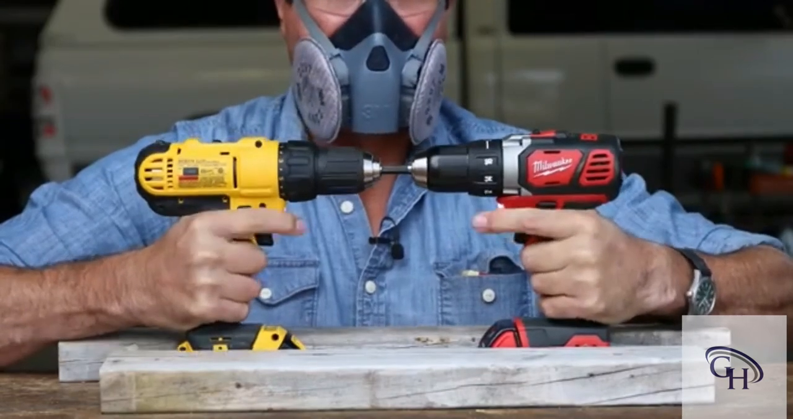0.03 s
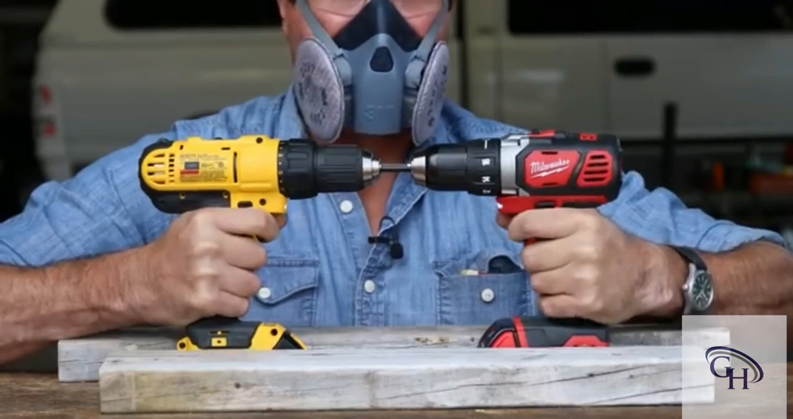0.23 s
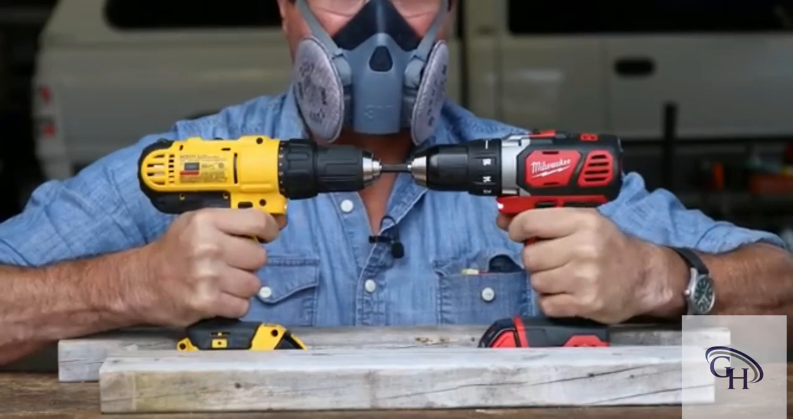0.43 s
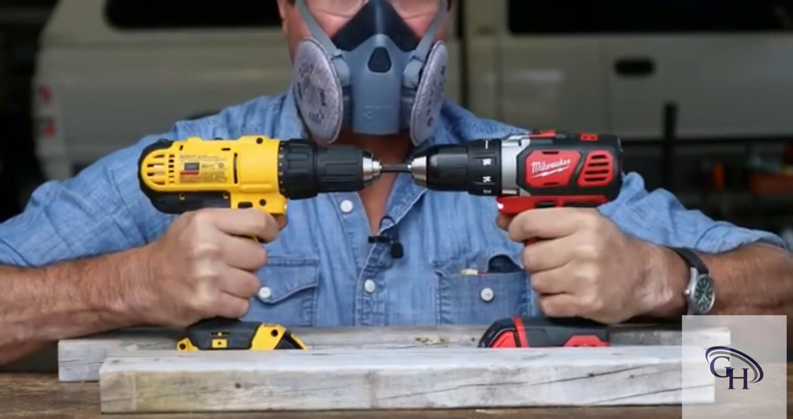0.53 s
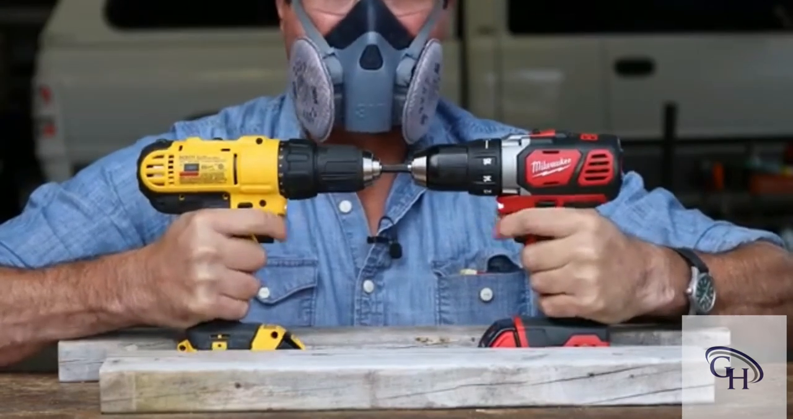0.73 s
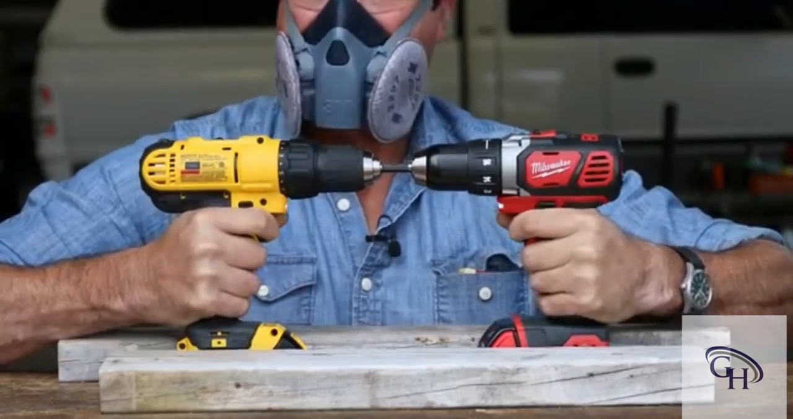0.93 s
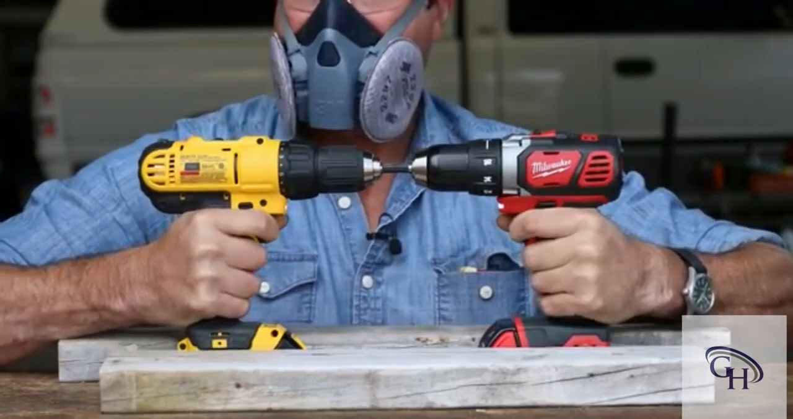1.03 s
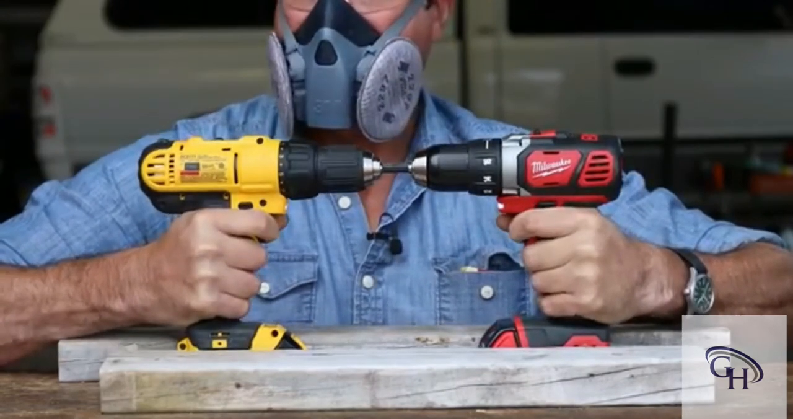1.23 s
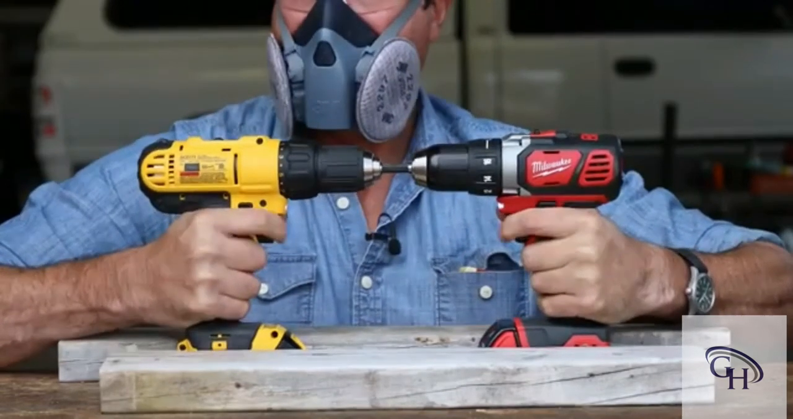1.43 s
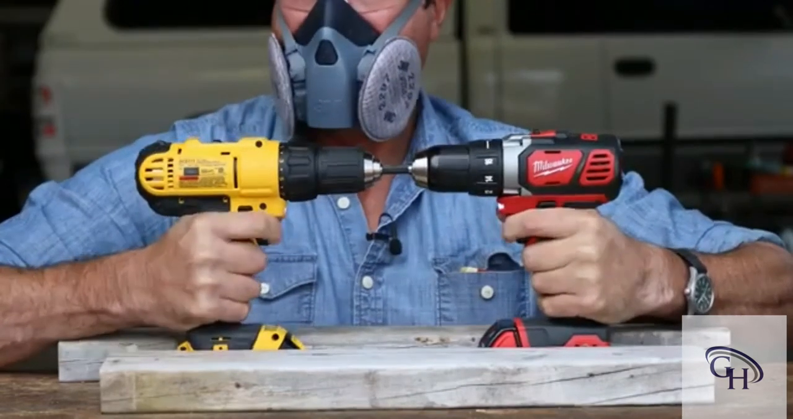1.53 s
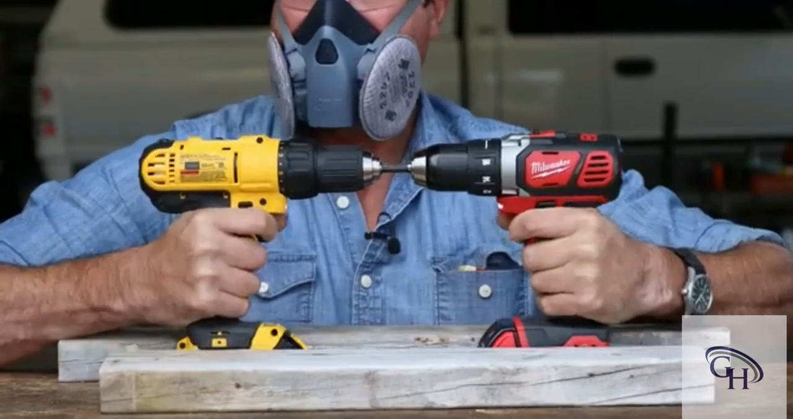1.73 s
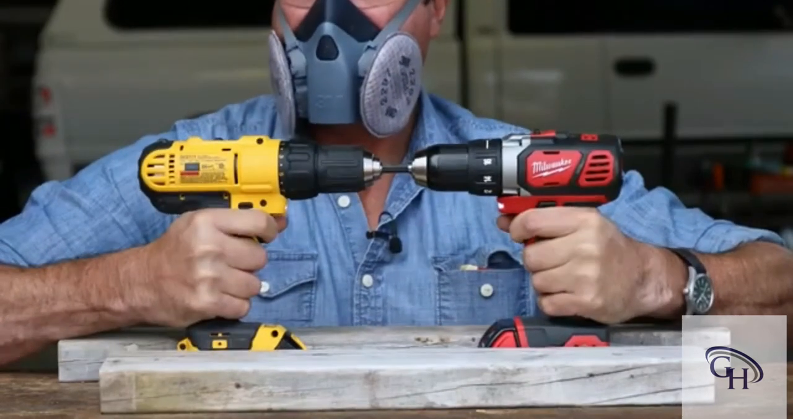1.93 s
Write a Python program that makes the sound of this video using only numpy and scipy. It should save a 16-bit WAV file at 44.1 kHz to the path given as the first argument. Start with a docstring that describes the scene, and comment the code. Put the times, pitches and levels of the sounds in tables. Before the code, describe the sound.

Two joined cordless drills jolt against each other, with loud hollow knocks at about 0.2, 0.95 and 1.7 seconds. Faint trigger clicks and a brief gear rasp lead into each knock, and gear chatter and soft low thumps follow. A sharp steel clack comes at 0.4 seconds and small clinks near 1.7. After each jolt, the workshop's reverberation rumbles away into quiet.

```python
"""Two cordless drills, joined chuck to chuck by one bit, are triggered against each other three times.
In each pull the triggers click and a stalled motor squeaks. The gears rasp through their slack, then
lock, and the impact excites the housings' modes in a hollow knock. The gears chatter and fall back as
the recoil thumps in the arms; the first release is a sharp clack of ringing steel.
After every jolt the workshop's reverberation rumbles away into quiet background noise."""
import sys
import numpy as np
from scipy import signal
from scipy.fft import rfft, irfft, next_fast_len
from scipy.io import wavfile

SR = 44100
rng = np.random.default_rng(int(sys.argv[2]) if len(sys.argv) > 2 else 0)


def file_out(sig):
    """Save sig as 16-bit WAV at sys.argv[1]."""
    # one column per channel
    cols = np.atleast_2d(sig).T
    # limit, then scale
    lim = np.clip(cols, -1, 1)
    pcm = np.round(lim * 32767).astype(np.int16)
    wavfile.write(sys.argv[1], SR, pcm)


N = 88200
T = np.arange(SR // 3) / SR  # time within one event [s]
HZ = np.fft.rfftfreq(2 * len(T), 1 / SR)


def amp(db):
    """Amplitude ratio of a level in decibels."""
    return 10 ** (np.asarray(db) / 20)


def unit_rms(x):
    """Normalisation to an rms of 1."""
    return x / np.sqrt(np.mean(x ** 2) + 1e-20)


def curve_at(points, hz):
    """Interpolation of (frequency, value) points on a logarithmic frequency axis."""
    freqs, values = np.transpose(points)
    return np.interp(np.log(hz + 1), np.log(freqs + 1), values)


def filtered(x, spectrum, tilt=0):
    """Zero-phase filtering by a spectrum, tilted above 1 kHz in dB per octave."""
    size = next_fast_len(len(x) + SR // 10)
    hz = np.fft.rfftfreq(size, 1 / SR)
    octaves = np.log2(np.maximum(hz / 1000, 1))
    gain = amp(curve_at(spectrum, hz) + tilt * octaves)
    return irfft(rfft(x, size) * gain, size)[:len(x)]


def noise(spectrum, tilt=0, size=len(T)):
    """Spectrally shaped Gaussian noise of rms 1."""
    return unit_rms(filtered(rng.standard_normal(size), spectrum, tilt))


def decay(t60, t=T):
    """Exponential decay, 60 dB in t60 seconds."""
    return np.exp(-np.log(1000) * t / t60)


def rise(attack_s, t=T):
    """First-order step response: a soft onset."""
    return 1 - np.exp(-t / attack_s)


def ring(modes, pitch=1):
    """Free vibration as a sum of damped sinusoids."""
    return sum(amp(db) * decay(t60) * np.sin(2 * np.pi * hz * pitch * T) for hz, db, t60 in modes)


def impulse_response(gain_db):
    """Minimum-phase response of a body with this gain at each of HZ, scaled to peak 1."""
    cepstrum = irfft(np.log(amp(gain_db)))[:len(T)]
    causal = cepstrum * np.where(T > 0, 2, 1)
    response = irfft(np.exp(rfft(causal, 2 * len(T))))[:len(T)]
    return response / np.abs(response).max()


def add(track, start_s, x):
    """Superposition of x on the track from start_s."""
    i = int(np.clip(round(start_s * SR), 0, N - 1))
    track[i:i + len(x)] += x[:N - i]


# Impacts on the housings: (time [s], level [dB], pitch factor [ratio])
KNOCKS = [(0.0595, -33.5, 1), (.095, -42.5, 0.69), (.1958, -36, 0.91), (0.2233, .5, 1.06),
          (.293, -30, 1.04), (.3858, -20, 1.08), (0.8115, -33, 0.97), (.833, -41.5, 0.81),
          (.953, -1, 1.023), (1.025, -42, 0.92), (1.1134, -30, 1.05), (1.463, -51, 1), (1.527, -35, 0.91),
          (1.5468, -33.5, 0.78), (1.6595, -36.5, 0.81), (1.6956, -.5, 1.007), (1.842, -18.5, 1.1),
          (1.886, -27, 1.1)]
# Hollow response of the housings at pitch factor 1: (frequency [Hz], gain [dB])
HOUSING_RESPONSE = [(30, -41.5), (105, -21.5), (205, -30), (290, -9), (375, 0.5), (450, -1.5), (530, -7),
                    (630, -1.5), (770, -0.5), (1050, -14.5), (1500, -19), (1900, -31), (3300, -31),
                    (5000, -47.5), (15000, -60.5)]
# Modes of housings and arms at pitch factor 1: (frequency [Hz], level [dB], T60 [s])
HOUSING_MODES = [(102.6, -32.5, 0.18), (390.5, -25.5, 0.12), (455, -25.5, 0.14), (780, -26.5, .07),
                 (1475, -33.5, 0.099), (1983, -40.5, .14), (2690, -39.5, 0.062)]
# Reflections from bench and chest: (delay [s], gain [dB])
REFLECTIONS = [(.0078, -15.5), (.0104, -16), (0.0185, -20.5)]
def housing_knocks():
    """Impulse excitation: the locking drive jolts both housings, and nearby surfaces reflect the knock."""
    out = np.zeros(N)
    for start, db, pitch in KNOCKS:
        hollow = impulse_response(curve_at(HOUSING_RESPONSE, HZ / pitch))
        ringing = rise(attack_s=0.003) * ring(HOUSING_MODES, pitch)
        knock = amp(db) * (hollow + ringing)
        add(out, start, knock)
        for delay, echo_db in REFLECTIONS:
            add(out, start + delay, amp(echo_db) * knock)
    return out


# Runs through the gears' slack:
# (time [s], duration [s], end level [dB], swell [dB], treble tilt [dB/octave], run-down T60 [s])
RASPS = [(0.028, 0.012, -43, -3, 0.5, 0.11), (0.164, 0.02, -55.5, -4, 2, 0.046),
         (.208, .007, -20.5, 19, 0.5, 0.016), (0.215, 0.01, -21.5, 2.5, -1, 0.022),
         (0.256, 0.017, -32.5, -3, -0.6, .11), (0.355, 0.022, -35, 10.5, 0.5, 0.15),
         (.771, .026, -42, 10, 0.5, 0.075), (0.889, 0.049, -56.5, 8, 2, .02),
         (0.938, 0.0079, -18.5, 21.5, 1.5, 0.026), (0.9469, 0.0079, -21, 1.5, 1, 0.015),
         (0.99, 0.015, -31, -1.5, 0, 0.063), (1.021, 0.013, -39, -6.5, -3.5, 0.12),
         (1.088, 0.022, -30.5, 17.5, .5, 0.1), (1.483, 0.029, -46, 8, 1, 0.097),
         (1.68, .0105, -22, 10.5, 2, 0.025), (1.6896, 0.0062, -17.5, 7, -1, .02),
         (1.717, .021, -31, -5, -1.5, 0.019), (1.818, 0.02, -32, 16, 1, .095)]
# Spectrum of the gear train: (frequency [Hz], level [dB])
GEAR_SPECTRUM = [(60, -10.5), (250, 2.5), (450, 5.5), (800, 0), (1350, 1), (2100, -8.5), (3000, -8.5),
                 (5000, -19.5), (8000, -20), (11000, -26.5), (15000, -31.5)]
def gear_rasps(contacts_per_s=1500, spread_db=3, friction_db=-3):
    """Backlash noise: random tooth impacts and friction excite the gears as they cross their slack."""
    out = np.zeros(N)
    for start, duration, db, swell_db, tilt, t60 in RASPS:
        contacts = rng.random(len(T)) < contacts_per_s / SR
        signs = rng.choice([-1, 1], len(T))
        strengths = amp(spread_db * rng.standard_normal(len(T)))
        teeth = unit_rms(contacts * signs * strengths)
        friction = amp(friction_db) * rng.standard_normal(len(T))
        rasp = unit_rms(filtered(teeth + friction, GEAR_SPECTRUM, tilt))
        swell = amp(db + swell_db * (np.minimum(T / duration, 1) - 1))
        run_down = decay(t60, np.maximum(T - duration, 0))
        add(out, start, rasp * swell * run_down * rise(attack_s=0.0016))
    return out


# Contacts of triggers, pawls and bit: (time [s], level [dB], treble tilt [dB/octave])
CLICKS = [(.0425, -29.5, -6.5), (.0965, -45, 1), (.1528, -43.5, -3), (.163, -48, -2), (.172, -38.5, 4),
          (.175, -35, -3.5), (.184, -35, -1.5), (.187, -46, 9), (.1953, -33, -2.5), (.204, -19.5, -1.5),
          (.2225, -1, -6.5), (.2585, -20.5, -1), (.2735, -22.5, 0), (.646, -46, -4.5), (.749, -48, 0.5),
          (.757, -41.5, -2.5), (.763, -46, -2), (.7815, -30.5, -4), (.795, -40, -6), (.836, -47.5, -1.5),
          (.9093, -32.5, -4), (.913, -39.5, 2), (.919, -41, 2), (.922, -44.5, -4.5), (.932, -21, -1),
          (.952, -16, -0.5), (.979, -26.5, -1.5), (.9915, -24, -1), (1.008, -29, -1.5), (1.129, -26, -7),
          (1.472, -48.5, -0.5), (1.496, -33.5, -5), (1.5065, -36.5, 0), (1.511, -33, -2),
          (1.626, -41.5, -1), (1.632, -39.5, -2.5), (1.643, -38.5, -1), (1.6585, -37, -5), (1.6755, -21, 1),
          (1.6945, -13, -0.5), (1.7195, -25.5, 4), (1.735, -14, -1), (1.738, -18.5, -5), (1.856, -25.5, -9),
          (1.969, -56.5, -0.5)]
# Spectrum of a hard contact: (frequency [Hz], level [dB])
CONTACT_SPECTRUM = [(100, -14), (500, 2.5), (1400, 4), (2000, -4), (2900, -1), (5000, -5), (7500, -4.5),
                    (11000, -10), (15000, -16)]
def contact_clicks(tail_db=-21):
    """Impact noise: brief contacts of plastic and steel radiate broadband bursts with a faint tail."""
    out = np.zeros(N)
    envelope = rise(attack_s=0.0006) * (decay(t60=0.01) + amp(tail_db) * decay(t60=0.066))
    envelope *= 0.5 / envelope.max()
    for start, db, tilt in CLICKS:
        add(out, start, amp(db) * envelope * noise(CONTACT_SPECTRUM, tilt))
    return out


# Snap of the spindle lock: (time [s], level [dB])
CLACKS = [(.3848, -15)]
# Modes of its steel parts: (frequency [Hz], level [dB], T60 [s])
STEEL_MODES = [(427.7, -10, 0.11), (650, -10, 0.028), (1240, 4.5, .022), (1620, -12, 0.043),
               (2540, -10, 0.025), (2786, -14.5, 0.014), (4040, -12.5, 0.057), (5100, -10.5, 0.024),
               (5740, -8, 0.027), (7700, -10.5, 0.016), (8700, -7.5, 0.026), (11750, -7, 0.025),
               (13000, -16, .035)]
def spindle_clack(crack_db=9):
    """Modal ringing: the spindle lock snaps with a broadband crack and its steel vibrates briefly."""
    out = np.zeros(N)
    for start, db in CLACKS:
        crack = amp(crack_db) * decay(t60=0.017) * noise(CONTACT_SPECTRUM)
        add(out, start, amp(db) * rise(attack_s=0.0011) * (ring(STEEL_MODES) + crack))
    return out


# Clinks of loose steel parts: (time [s], frequency [Hz], level [dB], T60 [s])
CLINKS = [(.649, 1400, -43.5, .035), (1.6743, 2800, -21, 0.015), (1.7343, 1167, -17, 0.022),
          (1.734, 3940, -27, 0.041)]
def steel_clinks():
    """Damped oscillation: each loose part rings in a single mode."""
    out = np.zeros(N)
    for start, hz, db, t60 in CLINKS:
        add(out, start, rise(attack_s=0.002) * ring([(hz, db, t60)]))
    return out


# Recoils into the arms: (time [s], level [dB])
THUMPS = [(.04, -41.5), (.09, -45.5), (0.223, -42), (.285, -33.5), (0.387, -39), (0.798, -43), (0.829, -48),
          (0.954, -37), (.985, -35), (1.023, -32), (1.12, -33.5), (1.512, -44), (1.543, -48.5),
          (1.702, -44), (1.744, -36), (1.836, -33)]
# Spectrum of a recoil: (frequency [Hz], level [dB])
THUMP_SPECTRUM = [(15, -8.5), (35, -2.5), (70, -2), (110, -2), (190, -2), (400, -12.5), (1000, -45.5),
                  (3000, -82)]
def recoil_thumps():
    """Damping: hands and arms take up the recoil in a dull, low-frequency burst."""
    out = np.zeros(N)
    envelope = rise(attack_s=0.0053) * decay(t60=0.13)
    for start, db in THUMPS:
        add(out, start, amp(db) * envelope * noise(THUMP_SPECTRUM))
    return out


# Squeaks of the stalled motor: (time [s], duration [s], level [dB])
SQUEAKS = [(0.007, 0.019, -53.5), (0.771, .01, -51), (1.481, .014, -55.5)]
# Harmonics of the switching tone: (frequency [Hz], level [dB])
SWITCHING_HARMONICS = [(3945, -1), (7890, -5), (11835, -9)]
def motor_squeaks(linewidth_hz=25):
    """Forced vibration: the speed control sings unsteadily in the windings before the motor turns."""
    out = np.zeros(N)
    phase_step = np.sqrt(2 * np.pi * linewidth_hz / SR)
    for start, duration, db in SQUEAKS:
        drift = phase_step * np.cumsum(rng.standard_normal(len(T)))  # broadens each harmonic
        tone = sum(amp(level) * np.sin(2 * np.pi * hz * T + order * drift)
                   for order, (hz, level) in enumerate(SWITCHING_HARMONICS, 1))
        envelope = rise(attack_s=0.001) * decay(t60=0.01, t=np.maximum(T - duration, 0))
        add(out, start, amp(db) * tone * envelope)
    return out


# Reverberation time of the workshop: (frequency [Hz], T60 [s])
ROOM_T60 = [(40, 0.56), (200, .8), (450, 0.63), (1300, .62), (4000, .47), (8000, 0.22), (15000, 0.15)]
# Colour of its reverberation: (frequency [Hz], gain [dB])
ROOM_RESPONSE = [(30, -2), (100, -16), (200, -8), (320, -16.5), (420, -9.5), (560, -18), (700, -15),
                 (1150, -22), (1800, -13.5), (2600, -16.5), (4000, -16.5), (8000, -21.5), (13000, -18)]
def workshop_reverberation(direct, pulls=3):
    """Diffuse field: each pull is convolved with its own noise tail, which dies fastest in the treble."""
    out = np.zeros(N)
    for part in np.array_split(np.arange(N), pulls):
        hz, t, bands = signal.stft(rng.standard_normal(N), SR, nperseg=256)
        t60 = curve_at(ROOM_T60, hz)[:, None]
        equal_energy = np.sqrt(2 * np.log(1000) / (t60 * SR))
        _, tail = signal.istft(bands * decay(t60, t) * equal_energy, SR, nperseg=256)
        build_up = rise(attack_s=0.0065, t=np.arange(N) / SR)
        response = filtered(tail[:N], ROOM_RESPONSE) * build_up
        add(out, part[0] / SR, signal.fftconvolve(direct[part], response))
    return out


# Spectrum of the workshop's background: (frequency [Hz], level [dB])
AMBIENT_SPECTRUM = [(20, 1.5), (120, -9), (420, -5.5), (750, -8), (1500, -17), (4000, -31.5), (15000, -39)]
def ambient_noise(level_db=-65):
    """Stationary noise: a faint, dull floor under the drills."""
    return amp(level_db) * noise(AMBIENT_SPECTRUM, size=N)


def scene():
    """Superposition of the drills' direct sound, its reverberation and the ambient noise."""
    drills = (housing_knocks() + gear_rasps() + contact_clicks() + spindle_clack()
              + steel_clinks() + motor_squeaks() + recoil_thumps())
    return (drills + workshop_reverberation(drills) + ambient_noise())[None]


# Treble roll-off of the microphone: (frequency [Hz], gain [dB])
MIC_RESPONSE = [(14800, 0), (15200, -22), (16400, -48.5)]
def record(dry, ceiling=0.9, cutoff_hz=16460):
    """Saturation and band limiting: the microphone rounds the highest peaks and loses the top treble."""
    rounded = dry[0] / (1 + np.abs(dry[0] / ceiling) ** 6) ** (1 / 6)
    spectrum = rfft(filtered(rounded, MIC_RESPONSE))
    passband = np.fft.rfftfreq(N, 1 / SR) < cutoff_hz
    return irfft(spectrum * passband, N)[None]


dry = scene()
out = record(dry)
file_out(out)
```